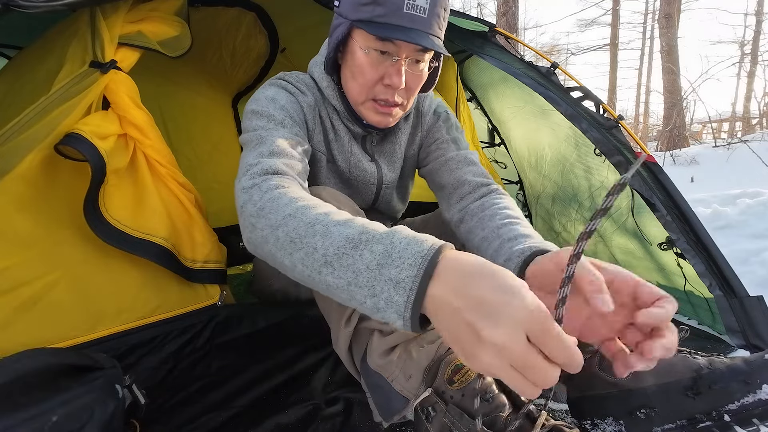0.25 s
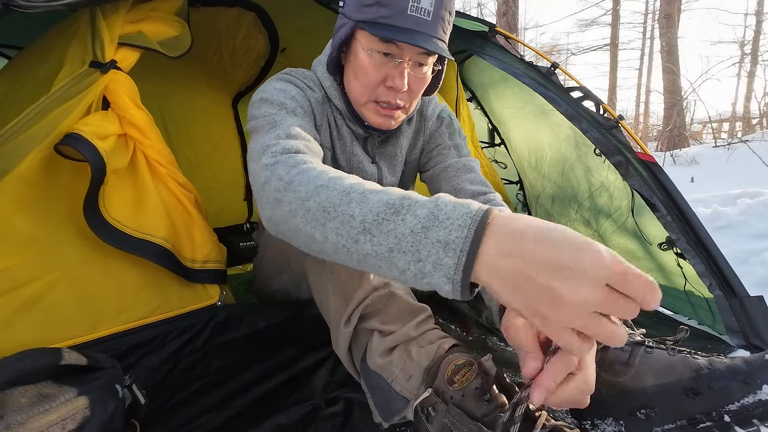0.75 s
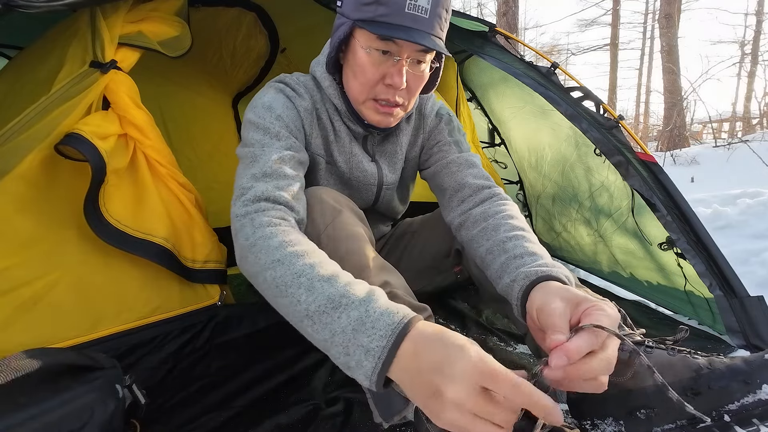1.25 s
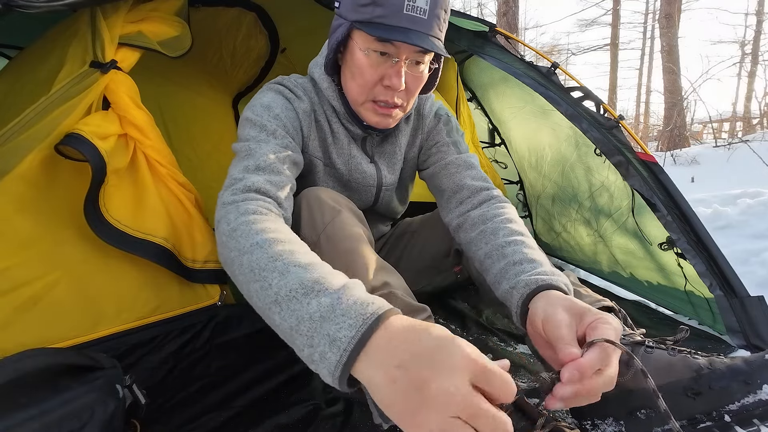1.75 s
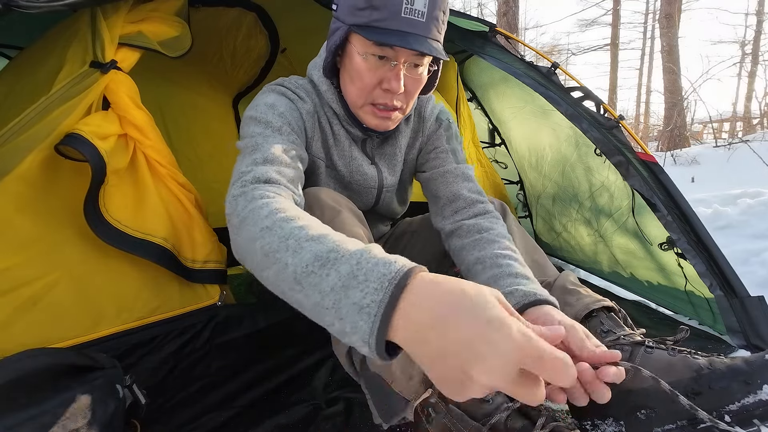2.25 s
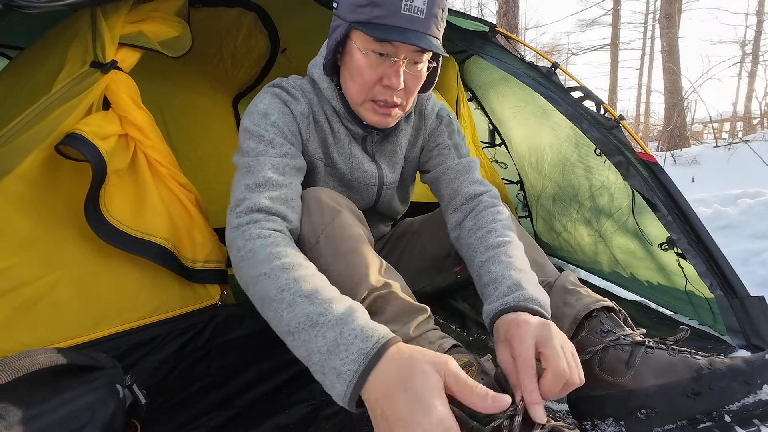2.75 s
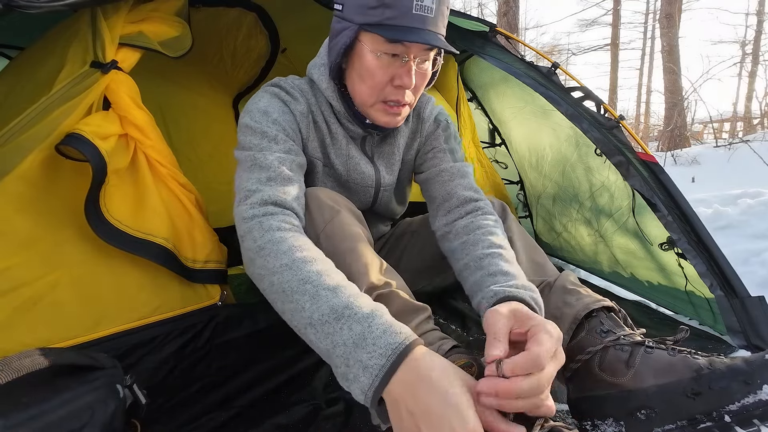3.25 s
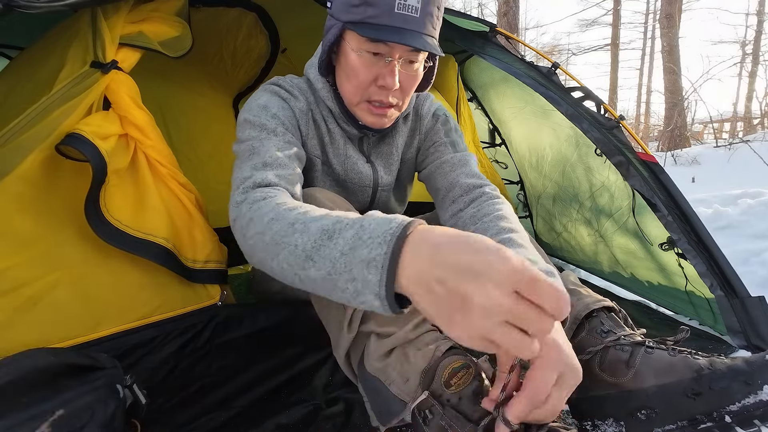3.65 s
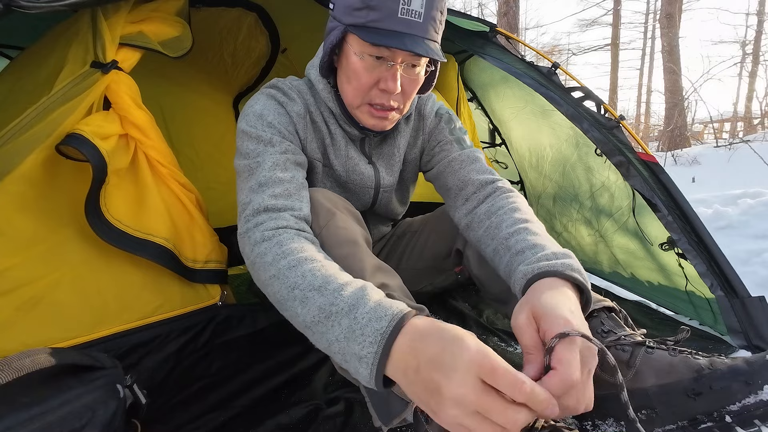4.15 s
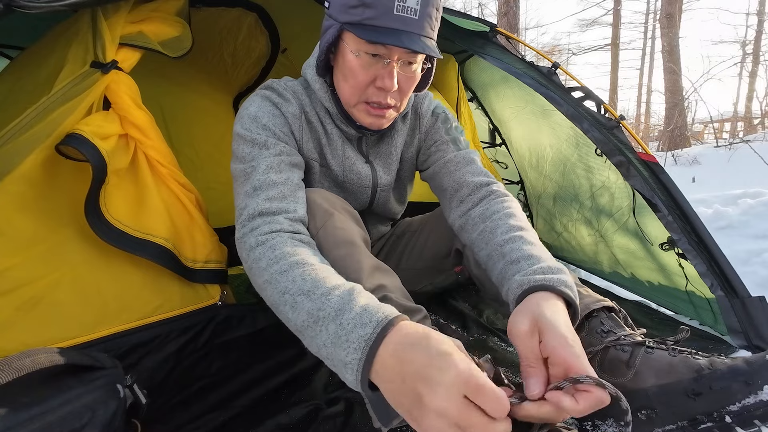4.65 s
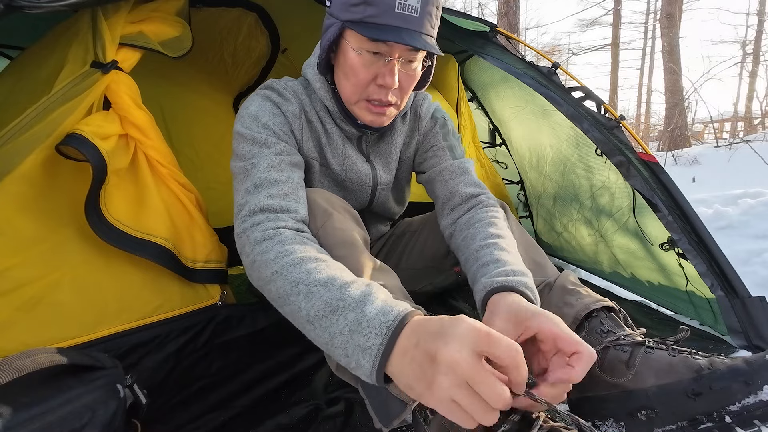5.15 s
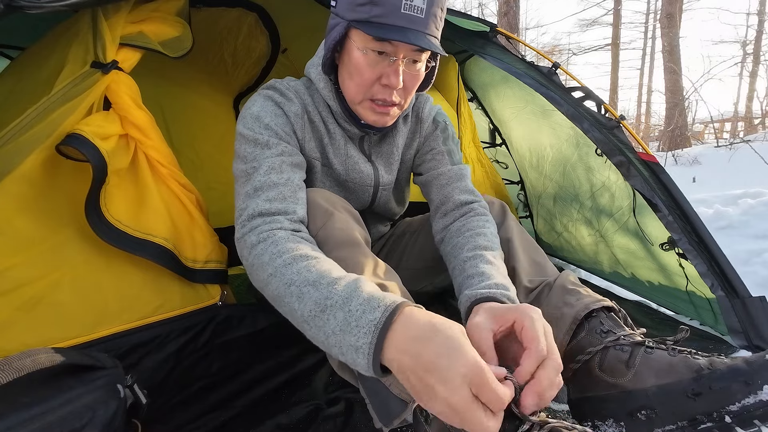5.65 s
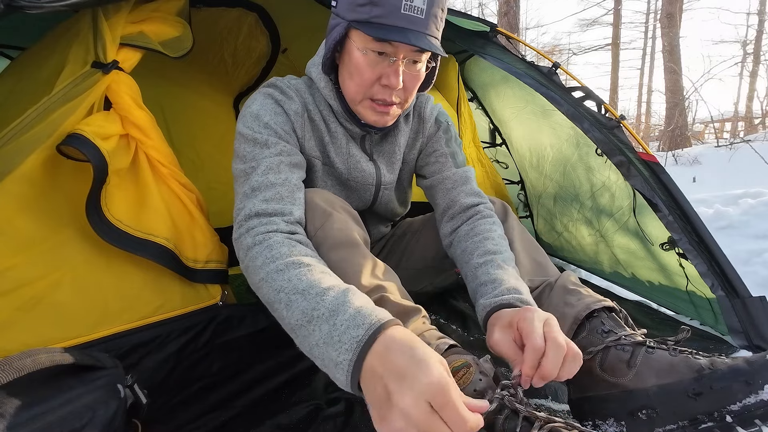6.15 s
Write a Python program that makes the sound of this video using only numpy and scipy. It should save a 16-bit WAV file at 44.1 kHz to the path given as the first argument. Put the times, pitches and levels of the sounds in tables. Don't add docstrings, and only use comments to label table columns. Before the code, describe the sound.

Close, dry lace tying on a hiking boot: soft cord scrapes, crisp fabric brushes and scattered sharp clicks above faint hiss and low rumble.

```python
import sys
import numpy as np
from scipy import signal
from scipy.fft import rfft, irfft, next_fast_len
from scipy.io import wavfile
from scipy.ndimage import uniform_filter1d

SR = 44100
rng = np.random.default_rng(int(sys.argv[2]) if len(sys.argv) > 2 else 0)


def to_wav(sig):
    pcm = np.clip(np.atleast_2d(sig), -1, 1) * 32767
    pcm = np.round(pcm).astype(np.int16)
    wavfile.write(sys.argv[1], SR, pcm.T)


def elevation(decibels):
    levels = np.asarray(decibels, float)
    return 10 ** (levels / 20)


N = 281799
SIZE = next_fast_len(N + 4096)
HZ = np.maximum(np.arange(SIZE // 2 + 1) * SR / SIZE, 1)
TICK_SIZE = 2200
STEP = 32

# pitch_hz, level_db, width_hz
BOOT_TONES = [(965, -1.5, 184), (1434, -0.5, 260), (2330, 0, 240), (3423, -5, 260)]
# pitch_hz, level_db, time_to_fade_60_db_s
PORT_TONES = [(4100, -19.5, 0.001), (5440, 3, 0.00076), (7980, 6.5, 0.0022), (9970, 7.5, 0.0017),
              (13120, -6, 0.012)]
# pitch_hz, level_db_per_hz
AIR_COLOUR = [(59, -21), (100, -3), (163, -6), (415, -12), (768, -9.5), (2040, -18.5), (2370, -16),
              (5080, -21), (6990, -30.5), (7940, -26.5), (9820, -25.5), (11900, -37), (13500, -22),
              (15000, -31), (16000, -47)]
# pitch_hz, level_db_per_hz
SLEEVE_COLOUR = [(4500, -30), (7100, -15), (7900, -9), (8700, -9), (10100, -6), (11600, -10), (12600, -6),
                 (13450, 0), (14300, -4), (15200, -6), (16000, -18)]
# pitch_hz, level_db_per_hz
FINGER_COLOUR = [(3000, -10), (4000, 0), (5300, 0), (6500, -2.5), (7100, -15), (8000, -19)]
# pitch_hz, level_db_per_hz
CORD_COLOUR = [(450, -7), (750, -4.5), (1400, -2), (2400, -2.5), (3700, -4), (4800, -25)]
# pitch_hz, level_db_per_hz
BOOT_COLOUR = [(90, -7), (150, 1.5), (300, -2), (600, -9), (1000, -26)]
# pitch_hz, level_db_per_hz
RUMBLE_COLOUR = [(12, -26), (20, 4.5), (45, -3.5), (58, 0), (72, -6), (150, -15.5), (200, -51), (330, -120)]
# pitch_hz, likeness_0_to_1
FAR_LIKENESS = [(60, 0.33), (150, 0.13), (380, 0.44), (950, 0.5), (2380, 0.36), (5980, 0.13), (15000, 0.12)]
# pitch_hz, likeness_0_to_1
NEAR_LIKENESS = [(60, 0.94), (150, 0.83), (380, 0.66), (950, 0.95), (2380, 0.97), (5980, 0.88),
                 (15000, 0.68)]
# pitch_hz, likeness_0_to_1
RUMBLE_LIKENESS = [(20, .75), (150, .66)]
# pitch_hz, lead_radians
LEFT_LEAD = [(20, 0), (4300, -.1), (9900, -.5), (12700, -.6), (14400, -1.4), (16000, -2.4)]
# time_s, level_db
RUMBLE_LEVEL = [(0, -56), (.3, -54), (.92, -57), (1.03, -51), (1.22, -56), (1.75, -51.5), (1.97, -54),
                (2.25, -52), (2.7, -56), (3.3, -52.5), (3.52, -58), (3.7, -54), (4.95, -58), (5.13, -53),
                (5.27, -58), (5.75, -53), (6.39, -56.5)]
# peak_s, swell_10_db_s, fade_10_db_s, level_db
BRUSHES = [(.115, .13, .08, -50.5), (.489, .04, .1, -59.5), (.567, .1, .05, -61), (.71, .055, .3, -61),
           (.948, .1, .2, -61), (1.15, .3, .05, -63), (1.838, .165, .1, -55.5), (1.96, .06, .13, -52.5),
           (2.06, .15, .03, -51.5), (2.21, .05, .1, -53), (2.295, .06, .04, -56), (2.72, .8, .07, -66),
           (2.939, .07, .2, -63), (3.097, .04, .057, -52.5), (3.215, .03, .077, -55),
           (3.385, .022, .07, -53), (3.452, .1, .023, -55), (3.54, .1, .05, -65), (3.65, .04, .2, -64),
           (3.777, .1, .05, -55), (4.05, .1, .5, -66), (4.6, .06, .035, -55), (4.69, .04, .07, -65),
           (5.1, .22, .1, -66), (5.3, .1, .2, -68), (5.482, .1, .08, -56), (5.67, .14, .04, -64),
           (6.022, .1, .075, -49.5), (6.192, .055, .07, -59.5), (6.32, .1, .3, -61)]
# peak_s, level_db
FLICKS = [
    (.822, -48.5),
    (1.271, -58.5),
    (1.489, -57),
    (.24, -64),
    (1.655, -60.5),
    (2.434, -48.5),
    (3.912, -62),
    (4.805, -57),
    (5.832, -54.5),
]
# peak_s, swell_10_db_s, fade_10_db_s, level_db, rubbed_tone_hz
PULLS = [(.11, .06, .06, -53, 950), (.42, .04, .6, -65, 2900), (.948, .06, .2, -61, 1200),
         (1.052, .05, .13, -49.5, 1600), (1.39, .11, .13, -55.5, 1020), (1.87, .17, .04, -57, 1810),
         (2.08, .05, .04, -51, 1000), (2.215, .065, .08, -53.5, 1100), (2.44, .09, .6, -62, 2900),
         (2.939, .08, .14, -55.5, 1420), (3.219, .07, .14, -56.5, 1370), (3.44, .045, .05, -47.5, 1900),
         (3.548, .13, .035, -51.5, 3360), (3.777, .13, .032, -50, 1500), (3.95, .025, .15, -49.5, 2050),
         (4.06, .12, .04, -49, 1700), (4.693, .5, .11, -61, 1500), (5.132, .14, .12, -63, 2230),
         (5.3, .06, .3, -58.5, 1210), (5.482, .07, .09, -55, 2900), (5.677, .1, .035, -58, 1590),
         (5.86, .09, .15, -60, 1290), (6.07, .2, .05, -56, 2000), (6.32, .08, .3, -59.5, 2900)]
# peak_s, level_db, rubbed_tone_hz
JERKS = [
    (.015, -58, 900),
    (.16, -57, 2000),
    (.485, -61, 1380),
    (3.097, -48.5, 1410),
    (3.395, -52, 1890),
    (4.62, -60, 1300),
    (4.805, -62, 2330),
    (6.192, -58, 1550),
]
# peak_s, swell_or_fade_10_db_s, level_db
RUBS = [(.135, .048, -55), (.485, .03, -65), (.828, .012, -55), (1.07, .09, -60), (1.85, .2, -64),
        (2.215, .07, -56), (3.24, .06, -63), (3.41, .09, -61), (3.548, .07, -64), (4.05, .1, -62),
        (4.585, .055, -56.5), (4.805, .02, -63), (5.46, .18, -61), (6.32, .12, -62.5)]
# peak_s, level_db
PUSHES = [(.01, -47), (.09, -52), (.46, -61), (.83, -58), (1.04, -58), (1.431, -60.5), (1.85, -55),
          (2.1, -54), (2.23, -49), (2.52, -60), (2.69, -60), (2.95, -56.5), (3.21, -54), (4.72, -60.5),
          (5.15, -61), (5.49, -57), (6.03, -57)]
# start_s, ring_peak_db, ring_hz,
# crack_peak_db
TIPS = [(.1133, -12, 2800, -5.5), (.1175, -22, 2170, -13), (.3946, -38, 1860, -67), (.832, -38, 2400, -29),
        (1.0329, -25, 4740, -32), (1.034, -23.5, 5070, -51), (1.0383, -34, 4940, -50),
        (2.096, -45, 2000, -56), (2.1447, -37.5, 3660, -59), (2.2124, -37, 4530, -18.5),
        (2.4323, -44, 2790, -36), (2.7066, -46, 5230, -32.5), (3.104, -42, 4100, -44),
        (3.261, -38, 2260, -45), (3.367, -46, 1820, -33), (3.923, -21.5, 2450, -40),
        (4.5884, -49, 4950, -43), (5.1384, -31.5, 2150, -62), (5.8207, -44.5, 1450, -32)]
# start_s, ring_peak_db, ring_hz, thud_peak_db, crack_peak_db
KNOCKS = [(.1064, -35, 840, -39, -40), (.1114, -33, 940, -53, -50), (.8195, -37.5, 900, -31.5, -35),
          (1.035, -35, 850, -58, -36), (1.2732, -52, 1180, -59, -39), (1.65, -59, 920, -49, -37),
          (2.0461, -34, 1060, -39, -41), (2.076, -29.5, 880, -50, -51), (2.082, -34, 1090, -46, -46),
          (2.1646, -46, 805, -41, -38), (2.2117, -51, 1800, -35.5, -12.5), (2.2345, -39, 1220, -31.5, -39),
          (3.093, -42, 990, -51, -41), (3.131, -40, 1480, -60, -56), (3.142, -39, 1500, -60, -58),
          (3.2244, -45, 800, -39, -44), (3.771, -29.5, 1390, -42, -42), (3.7825, -32.5, 1390, -47, -48),
          (3.923, -17.5, 1250, -48, -50.5), (4.102, -41.5, 1080, -57, -43), (4.1204, -55, 930, -40.5, -61),
          (5.2954, -49, 875, -46, -59), (5.4783, -53, 1140, -50, -39), (5.866, -46.5, 910, -44, -53)]


def rms_one(x):
    return x / np.sqrt(np.mean(x ** 2) + 1e-20)


def peak_at(x, db):
    return elevation(db) * x / abs(x).max()


def in_time(rows):
    s, *columns = np.transpose(rows)
    return [np.interp(np.arange(N) / SR, s, column) for column in columns]


def at_hz(points):
    hz, value = np.transpose(points)
    return np.interp(np.log(HZ), np.log(hz), value)


def drift(rate):
    r = np.exp(-80 * np.pi * rate / SR)
    chance = rng.standard_normal(N // 40 + 2002)
    slow = signal.lfilter([1], [1, -2 * r, r * r], chance)[2000:]
    slow = rms_one(slow - slow.mean())
    return np.interp(np.arange(N) / 40, np.arange(len(slow)), slow)


def ring(clicks, hz, t60):
    r = elevation(-60 / (t60 * SR))
    w = 2 * np.pi * hz / SR
    return signal.lfilter([0, np.sin(w)], [1, -2 * r * np.cos(w), r * r], clicks + 1e-18)


def fibres(per_s, spread_db, smooth):
    slips = (rng.random((2, N)) < per_s / SR) * rng.standard_normal((2, N))
    size = np.minimum(rng.exponential(1, (2, N)), 4)
    slips = slips * elevation(spread_db * size)
    return rms_one(slips) + smooth * rng.standard_normal((2, N))


def at_ports(sources, spectrum, likeness, patchy_db, rate, count):
    shared, own = rfft(sources, SIZE) * elevation(at_hz(spectrum))
    alike = np.clip(at_hz(likeness), 0, 1)
    turn = np.exp(.5j * at_hz(LEFT_LEAD))
    pair = np.sqrt(1 + alike) * shared * [turn, 1 / turn]
    pair = pair + np.sqrt(1 - alike) * own * [[1], [-1]]
    ends = np.log([spectrum[0][0], spectrum[-1][0]])
    place = np.interp(np.log(HZ), ends, [0, count - 1])
    out = np.zeros((2, N))
    for k in range(count):
        band = np.clip(1 - abs(place - k), 0, 1)
        out += elevation(patchy_db * drift(rate)) * irfft(pair * band, SIZE)[:, :N]
    return rms_one(out)


def strokes(rows):
    s, swell, fade, db = np.transpose(rows)[:4, :, None]
    late = np.arange(0, N + STEP, STEP) / SR - s
    away = np.maximum(-late / abs(swell), late / abs(fade))
    return db - 10 * away ** 1.4


def loudest(rest_db, *layers_db):
    return np.maximum(rest_db, np.vstack(layers_db).max(axis=0))


def hands():
    flicks = [(s, .015, .02, db) for s, db in FLICKS]
    rustle_db = loudest(-80, strokes(BRUSHES), strokes(flicks))

    rubs = [(s, w, w, db) for s, w, db in RUBS]
    rub_db = loudest(-72.5, strokes(rubs), rustle_db - 11.5)
    pushes = [(s, .07, .06, db) for s, db in PUSHES]
    shift_db = loudest(-65, strokes(pushes), rustle_db - 9.5)

    jerks = [(s, .028, .035, db, hz) for s, db, hz in JERKS]
    drags = np.array(list(PULLS) + jerks)
    drag_db = strokes(drags)
    region_hz = uniform_filter1d(drags[drag_db.argmax(axis=0), -1], size=28)
    controls = rustle_db, rub_db, loudest(-70, drag_db), region_hz, shift_db
    return [np.interp(np.arange(N) / STEP, np.arange(len(c)), c) for c in controls]


def air():
    hiss = at_ports(rng.standard_normal((2, N)), AIR_COLOUR, FAR_LIKENESS, 2.9, 2.3, count=9)
    rumble = at_ports(rng.standard_normal((2, N)), RUMBLE_COLOUR, RUMBLE_LIKENESS, 0.31, 2.3, count=3)
    return elevation(-59) * hiss + elevation(in_time(RUMBLE_LEVEL)[0] + 1.5) * rumble


def boot(shift_db):
    creaks = at_ports(fibres(300, 3.9, smooth=1.2), BOOT_COLOUR, NEAR_LIKENESS, 1.7, 6.2, count=3)
    return elevation(shift_db + 2.3 * drift(18)) * creaks


def cord(slide_db, region_hz):
    rasp = at_ports(fibres(2000, 2.5, smooth=1.1), CORD_COLOUR, NEAR_LIKENESS, 1.2, 12, count=6)
    out, power = rasp.copy(), 1
    for hz, db, width_hz in BOOT_TONES:
        t60 = np.log(1000) / (np.pi * width_hz)
        octaves_off = abs(np.log2(region_hz / hz))
        gain = elevation(1.5 + db - 10.5 * octaves_off)
        tone = rms_one(ring(ring(rasp, hz, t60), hz, t60))
        out += gain * elevation(1.2 * drift(14)) * tone
        power = power + gain ** 2
    return elevation(slide_db + 0.47 + 0.64 * drift(32)) * out / np.sqrt(power)


def cloth(rustle_db, rub_db):
    flurry_db = 1.5 * drift(30)
    sleeves = at_ports(fibres(4000, 2.4, smooth=.9), SLEEVE_COLOUR, NEAR_LIKENESS, 1.6, 14, count=8)
    fingers = at_ports(fibres(3000, 1.1, smooth=0.97), FINGER_COLOUR, NEAR_LIKENESS, 2.2, 17.0, count=3)
    return elevation(rustle_db + flurry_db + 2.36) * sleeves + elevation(rub_db + flurry_db + 0.07) * fingers


def strikes():
    rows = [(s, db, hz, .0058, db - 28, crack) for s, db, hz, crack in TIPS]
    rows += [(s, db, hz, .012, thud, crack) for s, db, hz, thud, crack in KNOCKS]
    return [(s, db, hz, t60 * elevation(-.15 * (db + 35)), thud, crack) for s, db, hz, t60, thud, crack in rows]


def ticks():
    hits = strikes()
    out = np.zeros((2, N + TICK_SIZE))
    chance = rng.standard_normal((len(hits), 9))
    blow = -1. * (np.arange(TICK_SIZE) == 0)
    no_bass = signal.butter(2, 150, "high", fs=SR, output="sos")
    treble = signal.butter(2, 2500, "high", fs=SR, output="sos")
    thud = ring(ring(blow, 305, .02), 560, 0.0042)
    thud = signal.sosfilt(no_bass, thud)
    for (s, ring_db, hz, t60, thud_db, crack_db), luck in zip(hits, chance):
        body = ring(blow, hz, t60)
        for (tone_hz, _, width_hz), k in zip(BOOT_TONES, luck):
            octaves_off = abs(np.log2(tone_hz / hz))
            body += elevation(-12 + 2 * k - 6.6 * octaves_off) * ring(blow, tone_hz, 3.7 / width_hz)
        limits = [.55 * hz, min(1.9 * hz, 15000)]
        body = signal.sosfilt(signal.butter(2, limits, "band", fs=SR, output="sos"), body)

        crack = np.zeros(TICK_SIZE)
        for (tone_hz, db, decay), k in zip(PORT_TONES, luck[4:]):
            crack += elevation(db + 2 * k) * ring(blow, tone_hz, decay)
        crack = peak_at(signal.sosfilt(treble, crack), crack_db - .5)

        hit = peak_at(body, ring_db) + peak_at(thud, thud_db - 4.5) + crack
        late = 0.31 * (np.roll(crack, 1) - crack)
        at = round(s * SR)
        out[:, at:at + TICK_SIZE] += (hit + late * [[1], [-1]]) * elevation([[-.6], [.6]])
    return out[:, :N]


def scatter(hits):
    age_s = np.arange(TICK_SIZE) / SR
    spray = rng.standard_normal((2, TICK_SIZE)) * elevation(-32 - 60 * age_s / .018) * (age_s > .0006)
    return signal.fftconvolve(hits, spray, axes=1)[:, :N]


def scene():
    rustle_db, rub_db, slide_db, region_hz, shift_db = hands()
    mix = air() + boot(shift_db) + cord(slide_db, region_hz) + cloth(rustle_db, rub_db)
    hits = ticks()
    return mix + hits + scatter(hits)


def roll_off(x):
    return signal.sosfilt(signal.butter(12, 15850, fs=SR, output="sos"), x)


def record(dry):
    return roll_off(dry)


dry = scene()
out = record(dry)
to_wav(out)
```